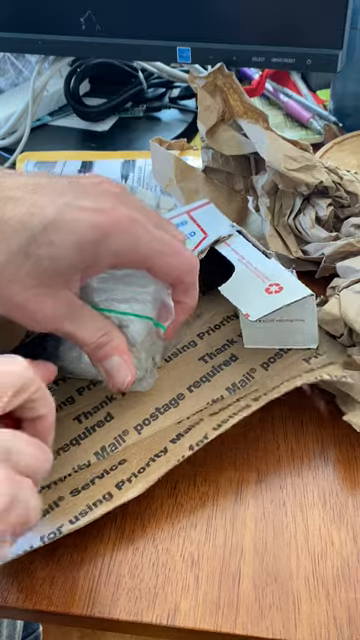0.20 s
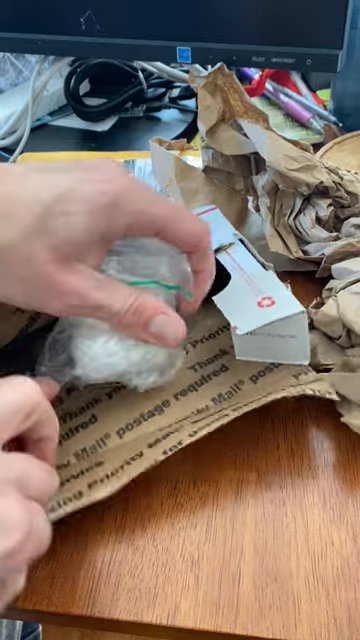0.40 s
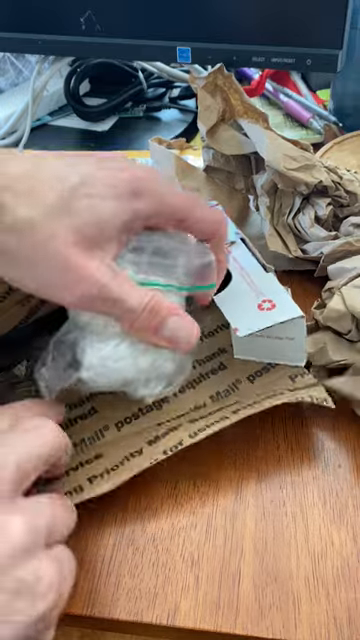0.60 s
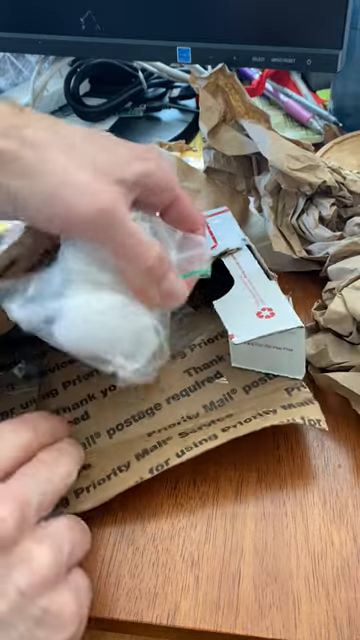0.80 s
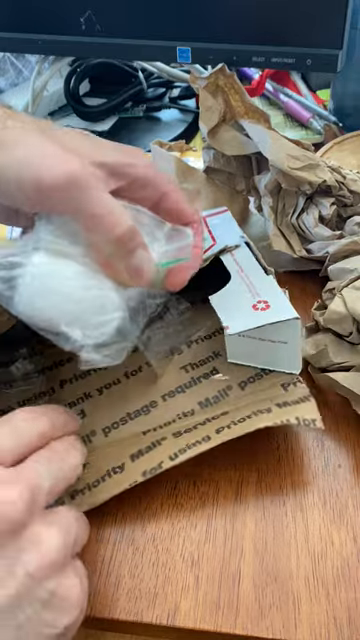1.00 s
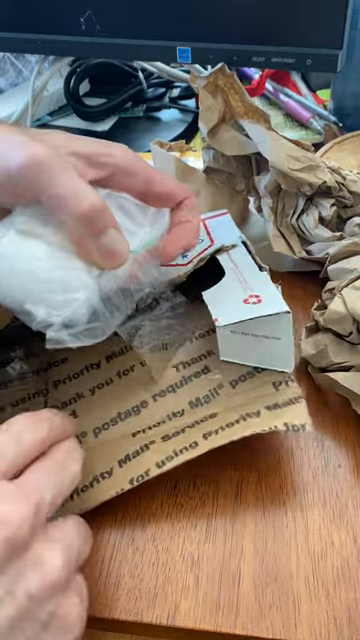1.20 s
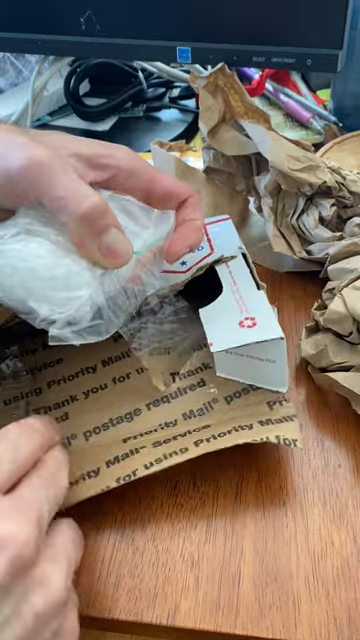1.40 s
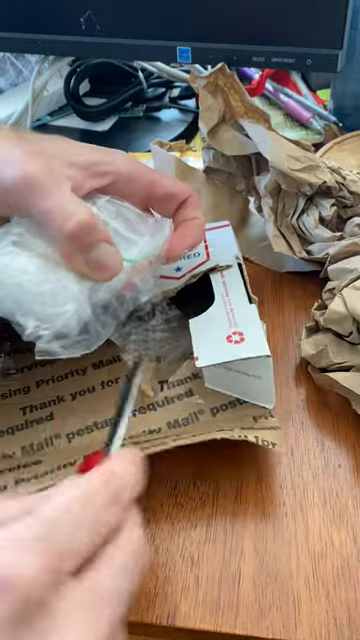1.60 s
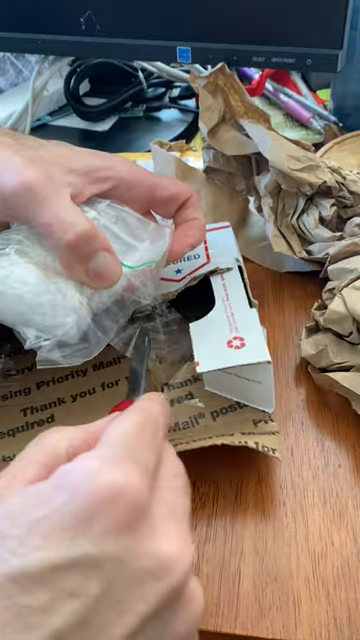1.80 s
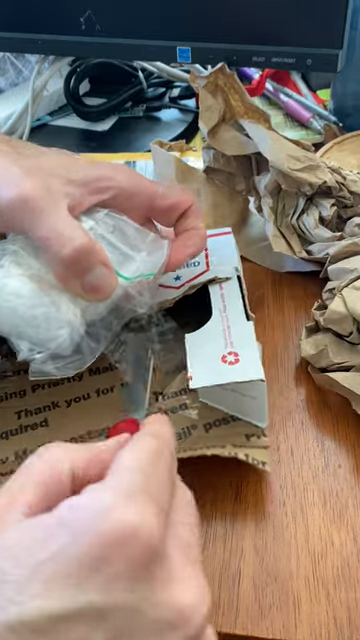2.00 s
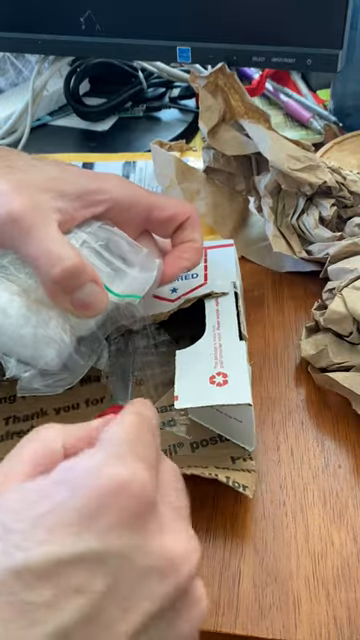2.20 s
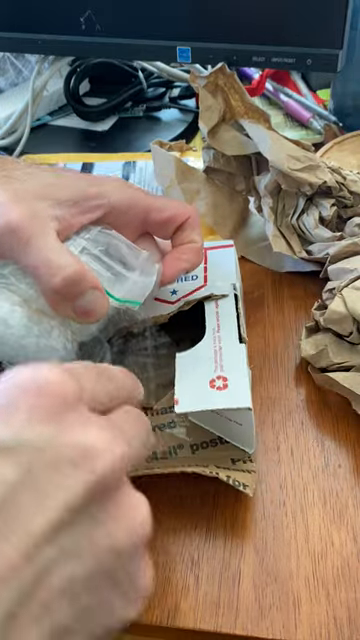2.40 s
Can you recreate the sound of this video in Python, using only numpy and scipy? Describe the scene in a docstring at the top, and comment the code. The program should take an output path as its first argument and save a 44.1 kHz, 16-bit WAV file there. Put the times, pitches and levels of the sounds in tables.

```python
"""On a desk in a small, low-humming room, a hand lifts a plastic-wrapped bundle out of a torn cardboard box.
Creases snap as short bursts of noise that ring the sheet, and card flaps knock as quick falling tones.
Random tiny slips make the crinkling, the rubbing on card, the scrape along the torn edge, and the slide of
fingers and then a small blade on the plastic. Narrow bands of noise make brief squeaks.
A pair of microphones close by hears it all, with a fading noise tail as the room's answer."""
import sys
import numpy as np
from scipy import signal
from scipy.fft import rfft, irfft, next_fast_len
from scipy.io import wavfile

SR = 44100
rng = np.random.default_rng(int(sys.argv[2]) if len(sys.argv) > 2 else 0)


def to_wav(sig):
    """Store sig (one row per channel, or 1-D mono) as 16-bit WAV at the path in sys.argv[1].

    Samples outside -1..1 are clipped; the rate is SR.
    """
    pcm = np.clip(np.atleast_2d(sig), -1, 1) * 32767
    pcm = np.round(pcm).astype(np.int16)
    wavfile.write(sys.argv[1], SR, pcm.T)  # frames by channels


N = 108045  # length in samples
HZ = np.fft.rfftfreq(4096, 1 / SR)  # frequencies at which colours are drawn
TIME = np.arange(N) / SR  # seconds

# In all event and curve tables, level_db is the level before the layer's own gain and the microphones.


def amp(db):
    """Turns decibels into a gain."""
    return 10 ** (np.asarray(db) / 20)


def unit(x):
    """Scales a sound to an rms (average strength) of 1."""
    return x / np.sqrt(np.mean(x ** 2) + 1e-20)


def burst(x):
    """Scales a short sound to the energy of one millisecond at rms 1."""
    return x * np.sqrt(SR / 1000 / np.sum(x ** 2))


def read(points, hz):
    """Reads a table between its points, on a log-frequency axis as the ear hears pitch."""
    f, value = np.transpose(points)
    return np.interp(np.log(hz + 1), np.log(f + 1), value)


def level(rows):
    """Turns a curve of (start_s, level_db) into a gain over time."""
    start_s, level_db = np.transpose(rows)
    return amp(np.interp(TIME, start_s, level_db))


def add(mix, s, sound):
    """Lays a sound into the mix at a time in seconds."""
    part = mix[max(round(s * SR), 0):][:len(sound)]
    part += sound[:len(part)]


def ring(db):
    """Builds the response of a body to one tap: the given spectrum, with nothing before the tap."""
    log_gain = np.log(amp(np.r_[db, db[-2:0:-1]]))
    spectrum = np.exp(np.conj(signal.hilbert(log_gain)))[:len(HZ)]
    return irfft(spectrum)[:2048]


def colour(x, points):
    """Sends a driving sound through a body with its own colour; rms 1."""
    return unit(signal.oaconvolve(x, ring(read(points, HZ)))[:N])


def grains(per_s, spread_db, clump_db, clump_s):
    """Tiny slips of random size and sign that come in clumps."""
    size = amp(spread_db * np.minimum(rng.exponential(1, N), 4)) * rng.choice([-1, 1], N)
    happens = rng.random(N) < per_s / SR
    knots = np.clip(rng.standard_normal(8000), -2, 2)
    clumps = np.interp(TIME / clump_s, np.arange(8000), knots)
    return size * happens * amp(clump_db * clumps)


def facet_ripple(depth_db):
    """Every facet of a sheet has its own broad peaks and dips, in dB."""
    knots = np.clip(rng.standard_normal(200), -2, 1.5)
    spacing_hz = 458
    return depth_db * np.interp(HZ / spacing_hz, np.arange(len(knots)), knots)


def facets(x, points, ripple_db, count=14):
    """Each slip rings one of several facets that share a colour; rms 1."""
    # a facet is picked at random for every 256 samples
    which = rng.integers(0, count, N // 256 + 1).repeat(256)[:N]
    shape = read(points, HZ)
    total = np.zeros(N)
    for k in range(count):
        body = ring(shape + facet_ripple(ripple_db))
        total += signal.oaconvolve(x * (which == k), body)[:N]
    return unit(total)


def background():
    """Low room rumble from coloured noise, with steady sine tones for the mains hum."""
    # colour of the rumble: pitch_hz [Hz], gain_db [dB]
    floor_colour = [(20, -37), (40, -1), (60, -8.5), (90, 1), (120, -10), (170, 2.5), (240, -2),
                    (310, -19.5), (420, -21.5), (1000, -28), (15500, -56)]
    # mains hum tones: pitch_hz [Hz], level_db [dB, rms]
    hum_tones = [(59.5, -61.5), (118.5, -59)]
    rumble_db = -53.5
    hum = np.zeros(N)
    for hz, db in hum_tones:
        hum += amp(db) * np.sqrt(2) * np.sin(2 * np.pi * (hz * TIME + rng.random()))
    return amp(rumble_db) * colour(rng.standard_normal(N), floor_colour) + hum


def room(x, gap_s):
    """A diffuse noise tail that swells in after a short gap, each band dying at its own speed."""
    # time for the echo to drop by 60 dB: pitch_hz [Hz], decay_s [s]
    room_decay = [(200, 0.66), (530, 0.43), (1400, 0.64), (3700, 0.5), (9700, 0.5), (16000, 0.97)]
    hz, t, z = signal.stft(rng.standard_normal(SR // 2), SR, nperseg=256)
    fading = z * amp(-60 * t / read(room_decay, hz)[:, None])
    tail = signal.istft(fading, SR, nperseg=256)[1]
    tail = tail * (1 - np.exp(-(np.arange(len(tail)) / SR / gap_s) ** 2))
    return signal.fftconvolve(x, tail / np.linalg.norm(tail))[:N]


def bending_waves(rows, gain_db):
    """Waves in a damped board: high notes arrive first, so each knock falls quickly in pitch."""
    # the pitch starts at 0.742 + 0.55 times the table's pitch and sinks towards 0.742 times it
    sink, glide, glide_s, grit_gain = 0.742, 0.55, 0.0034, 0.55
    out, t = np.zeros(N), np.arange(3000) / SR
    for s, db, hz, decay_s in rows:
        sweep_hz = hz * (sink + glide * np.exp(-t / glide_s))
        band = signal.butter(2, [hz * .5, hz * 1.44], "band", fs=SR, output="sos")
        grit = unit(signal.sosfilt(band, rng.standard_normal(len(t))))
        wave = np.sin(2 * np.pi * np.cumsum(sweep_hz) / SR) + grit_gain * grit
        envelope = (1 - np.exp(-t * hz * 2)) * np.exp(-t / decay_s)
        add(out, s, amp(gain_db + db) * burst(wave * envelope))
    return out


def desk_bumps():
    """The box bumps the desk: low, short bending waves."""
    # bumps: start_s [s], level_db [dB], pitch_hz [Hz, scaled by the fall in pitch], decay_s [s]
    bumps = [(0.3445, -12.5, 361, 0.0021), (0.348, -28.5, 216, 0.0049), (0.351, -31, 122, 0.0095),
             (0.979, -32.5, 302, 0.0032), (1.004, -34, 403, 0.0071)]
    return bending_waves(bumps, gain_db=3.5)


def flap_knocks():
    """The card flaps knock: bending waves of a higher pitch."""
    # knocks: start_s [s], level_db [dB], pitch_hz [Hz, scaled by the fall in pitch], decay_s [s]
    knocks = [(0.122, -30.5, 740, 0.0022), (0.22, -12, 830, 0.0011), (0.248, -28, 860, 0.0025),
              (0.2535, -22.5, 635, 0.0036), (0.301, -13, 560, 0.0015), (0.3012, -17, 1240, 0.0028),
              (0.3275, -11.5, 790, 0.0036), (0.344, -22, 1290, 0.0018), (0.345, -13, 570, 0.0058),
              (0.3495, -17, 900, 0.0011), (0.3675, -17, 1145, 0.0029), (0.3865, -12, 761, 0.005),
              (0.513, -29, 800, 0.0058), (0.586, -25.5, 930, 0.0024), (0.6645, -26.5, 820, 0.0015),
              (0.766, -23.5, 680, 0.002), (0.779, -23, 794, 0.0046), (0.8995, -22, 733, 0.0034),
              (0.9275, -27, 756, 0.0045), (0.949, -28.5, 790, 0.0026), (0.976, -24, 947, 0.003),
              (1.006, -25.5, 627, 0.001), (1.2995, -21.5, 806, 0.012), (1.403, -30.5, 740, 0.0057),
              (1.796, -38.5, 790, 0.0065), (1.812, -23.5, 805, 0.002), (2.162, -32.5, 707, 0.014),
              (2.182, -23.5, 740, 0.003), (2.263, -37.5, 824, 0.0036), (2.432, -33.5, 986, 0.0054)]
    return bending_waves(knocks, gain_db=1)


def rubbing():
    """Clumped slips of the bundle on the card, dulled by the card's colour."""
    # colour of the rub: pitch_hz [Hz], gain_db [dB]
    rub_colour = [(100, -18.5), (300, -6.5), (480, 0), (760, 2.5), (1050, 0.5), (1500, -5.5), (2500, -13),
                  (8000, -54)]
    # strength of the rub: start_s [s], level_db [dB]
    rub_curve = [(0, -52), (0.06, -40.5), (0.1, -47), (0.26, -40.5), (0.37, -35.5), (0.43, -38),
                 (0.55, -42.5), (0.615, -38), (0.69, -43), (0.79, -39.5), (0.95, -43.5), (1.03, -39.5),
                 (1.14, -45), (1.34, -36), (1.38, -52), (1.405, -37), (1.45, -51.5), (1.5, -41.5),
                 (1.6, -46.5), (1.67, -73), (1.77, -71), (1.83, -45.5), (1.9, -61), (1.96, -48.5),
                 (2.03, -58), (2.25, -50), (2.31, -56), (2.45, -48.5)]
    slips = grains(per_s=3000, spread_db=3, clump_db=3.5, clump_s=0.0072)
    return amp(-3.0) * colour(slips, rub_colour) * level(rub_curve)


def squeaks():
    """The film catches and sings for a moment: a narrow band of noise that rises a little in pitch."""
    # squeaks: start_s [s], length_s [s], level_db [dB], pitch_hz [Hz, halfway through]
    squeak_rows = [(0.035, 0.031, -40.5, 1311), (1.384, 0.014, -41, 1878), (1.502, 0.04, -43.5, 1784),
                   (1.551, 0.038, -39.5, 944)]
    width_hz, rise = 12, 0.08  # rise: total climb as a share of the pitch
    out, t = np.zeros(N), np.arange(SR // 8) / SR
    r = np.exp(-np.pi * width_hz / SR)
    for s, length_s, db, hz in squeak_rows:
        a, b = rng.standard_normal((2, len(t)))
        u = np.minimum(t / length_s, 1)  # runs from 0 to 1 over the squeak
        turn = np.exp(2j * np.pi * np.cumsum(hz * (1 + rise * (u - .5))) / SR)
        slow_noise = signal.lfilter([1], [1, -r], a + 1j * b)
        # turning the slow noise moves it up to the squeak's pitch
        add(out, s, amp(db) * np.sin(np.pi * u) * unit((turn * slow_noise).real))
    return out


def sliding():
    """A fine rasp of skin and steel on film: very many tiny slips, fingers first and then the blade."""
    # colour of the film: pitch_hz [Hz], gain_db [dB]
    slide_colour = [(300, -31.5), (1200, -10), (2300, -2.5), (3700, -5.5), (4500, -10), (5600, -10.5),
                    (8000, -18), (15500, -20)]
    # strength of the slide: start_s [s], level_db [dB]
    slide_curve = [(1.36, -72), (1.385, -66), (1.397, -32.5), (1.412, -32.5), (1.43, -54), (1.47, -36.5),
                   (1.5, -41.5), (1.58, -43.5), (1.63, -56), (1.7, -72.5), (1.78, -69), (1.815, -32),
                   (1.85, -66.5), (1.9, -67), (1.96, -43.5), (2.03, -66), (2.07, -47), (2.15, -42.5),
                   (2.19, -45), (2.23, -57), (2.3, -56), (2.38, -58), (2.45, -55)]
    slips = grains(per_s=7000, spread_db=3, clump_db=2, clump_s=.002)
    return amp(-1.5) * colour(slips, slide_colour) * level(slide_curve) * (TIME > slide_curve[0][0])


def scraping():
    """The wrapping drags over the torn edge: dense stick-slip rings the card's resonances."""
    # colour of the card: pitch_hz [Hz], gain_db [dB]
    scrape_colour = [(150, -29), (400, -17.5), (500, -6.5), (620, -7), (730, 1.5), (980, -15), (1200, -7),
                     (1750, -10.5), (2250, 2.5), (3100, -6), (3750, 3.5), (4350, -8), (5000, -2.5),
                     (7000, -11.5), (10000, -8), (15500, -12)]
    # strength of the scrape: start_s [s], level_db [dB]
    scrape_curve = [(1.16, -79), (1.182, -38), (1.216, -28.5), (1.232, -39), (1.238, -29), (1.278, -28),
                    (1.29, -26), (1.32, -29.5), (1.374, -51), (1.385, -83)]
    during = (TIME > scrape_curve[0][0]) & (TIME < scrape_curve[-1][0])
    slips = grains(per_s=3000, spread_db=2.7, clump_db=1.5, clump_s=.001)
    return amp(2.5) * facets(slips, scrape_colour, ripple_db=1.5) * level(scrape_curve) * during


def crinkling():
    """Fine ticks of the plastic as the bundle is lifted, each ringing a facet of the sheet."""
    # colour of the plastic: pitch_hz [Hz], gain_db [dB]
    crinkle_colour = [(200, -61), (900, -11.5), (1700, 2), (2800, 4.5), (3600, 1.5), (4400, -2),
                      (5400, 0.5), (7000, -5), (9000, -5), (15500, -9)]
    # strength of the crinkle: start_s [s], level_db [dB]
    crinkle_curve = [(0, -48.5), (0.09, -49.5), (0.21, -41), (0.255, -44.5), (0.322, -33.5), (0.335, -26.5),
                     (0.37, -32), (0.42, -40.5), (0.47, -45.5), (0.55, -44), (0.61, -36.5), (0.69, -44.5),
                     (0.74, -45), (0.78, -29), (0.81, -41.5), (0.87, -42), (0.915, -35.5), (0.955, -29),
                     (0.99, -44.5), (1.03, -32.5), (1.07, -40.5), (1.13, -47), (1.17, -41), (1.22, -66)]
    ticks = grains(per_s=1900, spread_db=3.8, clump_db=2, clump_s=.002)
    sheet = facets(ticks, crinkle_colour, ripple_db=4.5)
    return amp(-0.5) * sheet * level(crinkle_curve) * (TIME < crinkle_curve[-1][0])


def snaps():
    """Each crease flips with a millisecond or two of crackle that rings the facet beside it."""
    # creases: start_s [s], level_db [dB], brightness_db [dB per octave above 2 kHz], facet_hz [Hz]
    creases = [(.06, -30.5, -4.5, 2940), (0.1157, -31, -1, 5370), (0.124, -29.5, -1.5, 1680),
               (0.2193, -11, -2, 2520), (.254, -23, -6.5, 1250), (0.2596, -24, -4, 5380),
               (0.266, -23.5, 0, 4900), (0.2994, -10.5, 1, 4900), (.3258, -8.5, -3, 2250),
               (0.344, -9.5, -2, 3080), (0.3498, -14.5, -8.5, 2200), (.5257, -26.5, 4.5, 6450),
               (0.5854, -23.5, 1.5, 1500), (0.6627, -29.5, -7, 4930), (0.707, -22, 1.5, 4740),
               (0.713, -25, 9, 5200), (0.7574, -21.5, 1, 5350), (.7645, -20, 1.5, 5250),
               (.773, -17.5, 1.5, 2660), (0.778, -16, -1.5, 3130), (.8343, -28, 1, 3960),
               (.851, -24, -1, 3360), (0.8868, -26, -3, 3630), (0.8974, -23, -3, 2870),
               (.927, -20.5, 0, 2440), (1.0321, -18, 9.5, 6200), (1.1066, -25, 0.5, 1930),
               (1.241, -27, -2, 4940), (1.252, -22.5, -3, 3620), (1.2851, -16.5, -9, 2160),
               (1.286, -29, -1.5, 3730), (1.296, -18.5, -3, 3700), (1.3138, -25, -7.5, 2240),
               (1.3503, -23, 1.5, 5300), (1.4748, -21, -0.5, 5070), (1.609, -30.5, -2, 2960),
               (1.8111, -19, -1.5, 2550), (1.8251, -28.5, 5.5, 3860), (1.8688, -26.5, 0, 6240),
               (1.9109, -33, -0.5, 6290), (2.1606, -20, -3, 3960), (2.1815, -25, -0.5, 2470),
               (2.193, -23, -1, 2650), (2.2309, -33.5, -2, 2000), (2.261, -27, -2.5, 5100),
               (2.3323, -28.5, 0, 6800), (2.3454, -20, 0.5, 6450), (2.405, -36.5, -9, 2700),
               (2.4317, -32.5, -1.5, 2350)]
    # colour shared by all snaps: pitch_hz [Hz], gain_db [dB]
    snap_colour = [(100, -9), (400, -19), (800, -3.5), (1300, -5), (1800, -9.5), (2450, -0.5), (3300, -6.5),
                   (3900, 1), (4400, -8), (5200, -0.5), (7000, -3.5), (10000, -4), (15500, -8)]
    gain_db, rise_s, decay_s = 1, 0.00018, 0.001
    evenness = 0.6  # 0 leaves the crackle's spectrum alone, 1 nearly flattens it
    peak_db, peak_width_hz, ripple_db = 8, 330, 2
    out, t = np.zeros(N), np.arange(400) / SR
    lead = 128  # samples of silence ahead, as evening out the spectrum smears the start
    octaves = np.log2(np.maximum(HZ, 2000) / 4000)
    for s, db, tilt_db, hz in creases:
        crackle = rng.standard_normal(len(t)) * (1 - np.exp(-t / rise_s)) * np.exp(-t / decay_s)
        z = rfft(np.r_[np.zeros(lead), crackle])
        drive = irfft(z / (abs(z) + 0.046 * abs(z).mean()) ** evenness)
        facet = peak_db / (1 + ((HZ - hz) / peak_width_hz) ** 2) + facet_ripple(ripple_db)
        body = ring(read(snap_colour, HZ) + facet + tilt_db * octaves)
        add(out, s - lead / SR, amp(gain_db + db) * burst(signal.fftconvolve(drive, body)))
    return out


def drifting_balance():
    """The left-right balance of all the near sounds drifts at random, a decibel or so, within hundredths of a second."""
    spread_db, change_s = 1.8, .012  # left over right, and the time between new random balances
    knots = np.clip(rng.standard_normal(1000), -1.5, 1.5)
    drift = np.interp(TIME / change_s, np.arange(len(knots)), knots)
    return amp(np.outer([.5, -.5], spread_db * drift))


def ports(x):
    """Two microphone ports: the high treble reaches the left first, and loudness differs with pitch."""
    # how far the left is ahead: pitch_hz [Hz], lead_rad [radians]
    port_lead = [(0, 0), (250, 0), (520, -.35), (780, .45), (1100, -.2), (2000, .1), (2700, .6),
                 (3200, .35), (4900, .1), (5500, .7), (6900, 2.8), (8500, 4.3), (10400, 6.3), (11000, 6.6),
                 (13500, 9.4), (16000, 11.8)]
    # left over right: pitch_hz [Hz], balance_db [dB]
    port_balance = [(100, -1.4), (400, -2.5), (640, -11), (900, 5), (1150, -6), (1750, 0), (3000, -4.5),
                    (4300, -2), (5500, 0.2), (15000, -0.5)]
    size = next_fast_len(N + 4096)
    hz = np.fft.rfftfreq(size, 1 / SR)
    ratio, lead = amp(read(port_balance, hz)), read(port_lead, hz)
    # the last factor keeps the summed power of both sides the same at every pitch
    pair = np.array([ratio, np.exp(-1j * lead)]) * np.sqrt(2 / (1 + ratio ** 2))
    return irfft(rfft(x, size) * pair, size)[:, :N]


def scene():
    """Everything on the desk, with the room behind it."""
    near = desk_bumps() + flap_knocks() + rubbing() + squeaks()
    near = near + sliding() + scraping() + crinkling() + snaps()
    # separate tails for left and right make the room wide
    wide = amp(-14) * np.array([room(near, gap_s=.002), room(near, gap_s=.002)])
    behind = amp(-15.5) * room(near, gap_s=0.0016) + background()
    return ports(near) * drifting_balance() + ports(behind) + wide


def record(dry):
    """Low cut, soft overload on the loudest peaks, then the recorder's band limit."""
    low_cut_hz, ceiling, edge_hz = 42, .95, 16200
    cut = signal.sosfilt(signal.butter(3, low_cut_hz, "high", fs=SR, output="sos"), dry)
    limited = cut / (1 + (cut / ceiling) ** 6) ** (1 / 6)
    band_limit = signal.firwin(255, edge_hz, window=("kaiser", 9), fs=SR)
    return signal.oaconvolve(limited, band_limit[None], "same", axes=1)


dry = scene()
out = record(dry)
to_wav(out)
```